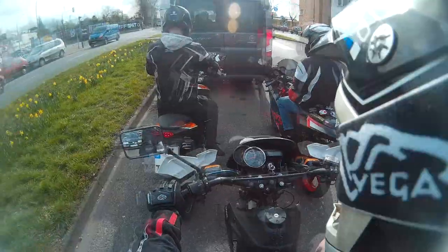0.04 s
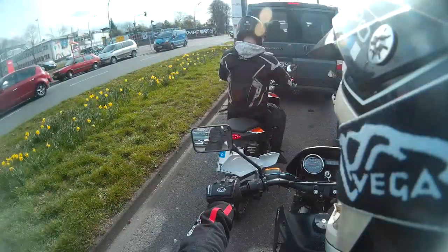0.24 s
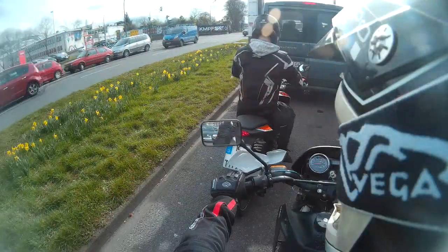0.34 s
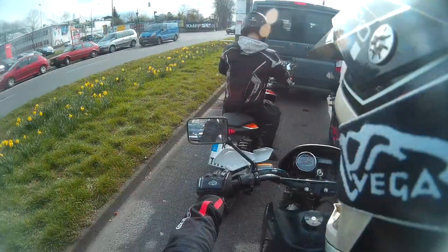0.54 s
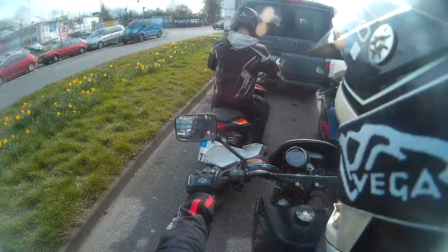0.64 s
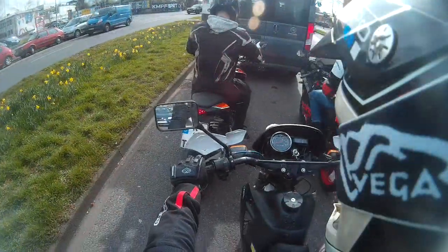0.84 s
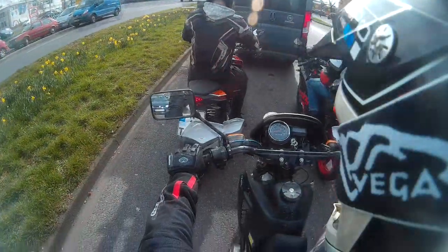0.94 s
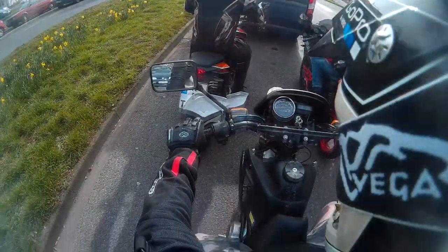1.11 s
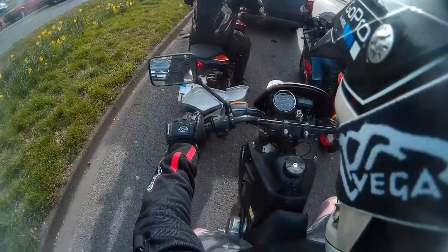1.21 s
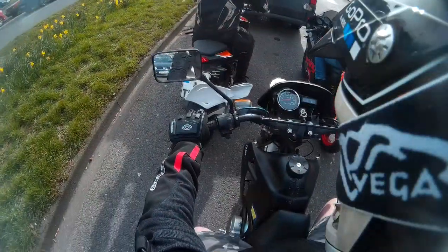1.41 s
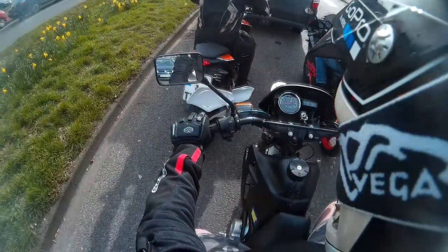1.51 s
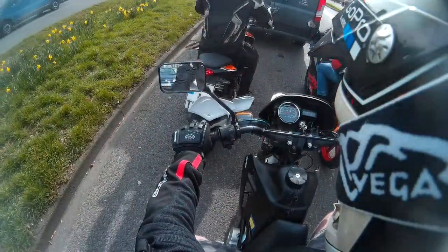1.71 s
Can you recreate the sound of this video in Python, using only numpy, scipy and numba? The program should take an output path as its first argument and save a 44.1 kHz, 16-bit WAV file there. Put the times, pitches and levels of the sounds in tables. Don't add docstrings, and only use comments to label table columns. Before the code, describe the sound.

Close outdoor helmet recording of one small motorcycle engine: faint puttering, a swift buzzing rev with nasal intake rasp, then throttle shut and a whirring, rattling descent with soft pops over faint idling engines.

```python
import sys
import numpy as np
from scipy import signal
from scipy.fft import rfft, irfft
from scipy.io import wavfile
from scipy.ndimage import uniform_filter1d
from numba import njit

SR = 44100
rng = np.random.default_rng(int(sys.argv[2]) if len(sys.argv) > 2 else 0)


def wav_record(signal):
    frames = np.transpose(np.atleast_2d(signal))
    bounded = np.clip(frames, -1, 1)
    quanta = np.round(bounded * 32767).astype(np.int16)
    wavfile.write(sys.argv[1], SR, quanta)


def how_loud(loudness_db):
    steps = np.asarray(loudness_db, float) / 20
    return 10 ** steps


N = 77175


def level(x, db):
    return x * how_loud(db) / np.sqrt(np.mean(x ** 2))


def sine(cycles):
    return np.sin(2 * np.pi * cycles)


@njit
def resonator(x, hz, width):
    y, band, low = np.empty(len(x)), 0., 0.
    g, damping = np.tan(np.pi * hz / SR), width / hz
    for i in range(len(x)):
        v = (band + g * (x[i] - low)) / (1 + g * (g + damping))
        band = 2 * v - band
        low += 2 * g * v
        y[i] = damping * v
    return y


def ring(x, peaks):
    out = 0
    for k, (hz, width, db) in enumerate(peaks):
        out = out + (-1) ** k * how_loud(db) * resonator(x, float(hz), float(width))
    return out


def colour(x, points):
    hz, db = np.array(points).T
    f = np.maximum(np.arange(N // 2 + 1) * SR / N, 1)
    return irfft(rfft(x) * how_loud(np.interp(np.log(f), np.log(hz), db)), N)


def walk(rate):
    hold = int(SR / rate)
    steps = np.repeat(rng.standard_normal(N // hold + 1), hold)[:N]
    return uniform_filter1d(uniform_filter1d(steps, hold), hold)


@njit
def feed_back(x, back, keep):
    y = x.copy()
    for i in range(len(x)):
        if back[i] >= 0:
            y[i] += keep * y[int(back[i] + .5)]
    return y


def repeating(turns, keep):
    fresh = rng.standard_normal(N) * np.sqrt(1 - keep ** 2)
    one_turn_ago = np.interp(turns - 1, turns, np.arange(N) * 1., left=-1.)
    return feed_back(fresh, one_turn_ago, keep)


def orders(turns, hz, table, peaks, leak_db, wander_db, slip):
    out = 0
    for k, db in table:
        power = how_loud(2 * leak_db)
        for centre, width, peak_db in peaks:
            power = power + how_loud(2 * peak_db) / (1 + (2 * (k * hz - centre) / width) ** 4)
        loudness = np.sqrt(power) * how_loud(db + wander_db * walk(13.8))
        out = out + loudness * sine(k * turns + rng.random() + slip * walk(24.55))
    return np.sqrt(2) * out


# (centre [Hz], width [Hz], level [dB])
AIRBOX_MODES = [(1105, 13, -8), (1550, 23, -5), (2080, 400, -9.5), (2550, 29, 3.5), (2827, 19, 1.5),
                (3086, 96, -8.5), (5060, 58, -12.5), (6000, 170, -15), (7420, 230, -28.5), (9450, 85, -44),
                (10070, 310, -41), (12300, 1100, -61), (13700, 270, -36)]
# (frequency [Hz], density [dB per Hz])
AIR_RUSH = [(500, -3.5), (1600, -3.5), (3400, 4.5), (4100, -28.5), (6000, -23), (8000, -37), (13900, -52),
            (15500, -70)]
GULP_S, GULP_EDGE_S, GULP_STRETCH = .00855, .0015, .2
HOWL_REST_HZ, HOWL_FROM_HZ, HOWL_TO_HZ = 1950, 2600, 2070
FULL_SPEED = 94
OVERTONE_FROM_HZ, OVERTONE_TO_HZ = 3750, 2800


def intake(turns, hz, open_db):
    since, turn = turns % 1 / hz, turns.astype(int)
    gulp_s = GULP_S * (FULL_SPEED / hz) ** GULP_STRETCH
    gate = np.clip(np.minimum(since, gulp_s - since) / GULP_EDGE_S, 0, 1)
    gate = gate * (1 - .24 * np.cos(2 * np.pi * 198 * (since + .00015)))
    rasp = repeating(turns, .7) * gate

    start_hz = HOWL_REST_HZ + (HOWL_FROM_HZ - HOWL_REST_HZ) * hz / FULL_SPEED
    glide = since ** 2 / (2 * GULP_S)
    cycles = start_hz * since + (HOWL_TO_HZ - start_hz) * glide
    chance = rng.standard_normal((200, 2))
    slip, size = .038 * np.cumsum(chance[:, 0]), how_loud(1.0 * chance[:, 1])
    howl = resonator(gate * size[turn] * sine(cycles + slip[turn]), 2140., 610.)

    upper = OVERTONE_FROM_HZ * since + (OVERTONE_TO_HZ - OVERTONE_FROM_HZ) * glide
    upper_gain = how_loud(-10 + 2.5 * walk(95.1))
    howl = howl + upper_gain * gate * sine(upper + .2 * walk(150))

    rasp = level(ring(rasp, AIRBOX_MODES), -10) + level(colour(rasp, AIR_RUSH), -9.5)
    snap = rng.standard_normal(N) * gate * np.exp(-since / .003)
    snap = colour(snap, [(2000, -30), (4000, 0), (8000, -9), (14000, -18), (15500, -30)])
    howl = howl + level(snap, -27)
    return how_loud(open_db) * level(howl, 0) + how_loud(.8 * open_db - 7) * rasp


# (centre [Hz], width [Hz], level [dB])
HOT_PIPE = [(81, 67, -17.5), (141, 33, -9), (259.3, 39.6, 0), (322, 49, -4.5), (381.6, 26, -4.5),
            (447.4, 43, 1), (542, 60, -9), (723, 70, -10), (1086, 89, -9.5)]


def firing(turns, hz, open_db, shut):
    even = [(k, 0) for k in range(1, 14)]
    stack = orders(turns, hz, even, HOT_PIPE, leak_db=-32, wander_db=1.0, slip=.029)
    drone = level(resonator(rng.standard_normal(N), 450., 30.), -41)
    return how_loud(-24.5 + .58 * open_db) * stack + how_loud(.25 * open_db) * drone * (1 - shut)


# (centre [Hz], width [Hz], level [dB])
CASE_MODES = [(1075, 40, -14), (1240, 40, -9), (1522, 70, -5.5), (1924, 60, 2), (2065, 127, 1.5),
              (2213, 60, 3), (2818, 94, -8), (3000, 202, -1), (3260, 90, -12), (4600, 300, -15),
              (5050, 260, -15), (5650, 300, -19), (7530, 200, -32)]
# (frequency [Hz], density [dB per Hz])
CASING_WALLS = [(100, -13), (450, -8.5), (800, -14), (1600, -7), (3500, -11.5), (4100, -20), (7000, -30.5),
                (15500, -60.5)]
# (multiple of crank rate [1], level [dB])
GEAR_TEETH = [(12, -2), (14, -3), (16, 0), (17, -4), (22, 3), (23, -11), (24, -7), (25, -11), (26, -2),
              (27, -5), (28, -9), (29, -5), (30, -4), (31, -4), (32, -7), (34, -10)]
# (centre [Hz], width [Hz], level [dB])
GEARBOX_MODES = [(1062, 51, -12), (1241, 41, -9.5), (1511, 106, -13), (1917, 110, -3), (2066, 170, 0.5),
                 (2176, 69, -1.5), (3030, 320, -4)]
# (multiple of crank rate [1], level [dB])
PUMP_PULSES = [(1, -14), (2, -18), (3, -14), (4, 0), (5, -7), (6, -10), (7, -17), (8, -15), (9, -23),
               (10, -12)]
# (centre [Hz], width [Hz], level [dB])
OVERRUN_PIPE = [(157, 34, 4), (317, 110, -11), (377.8, 33.5, -2), (449.9, 35.8, 3), (652, 29, 4),
                (708, 55, -3.5)]


def mechanics(turns, hz, run_db, shut):
    clatter = repeating(turns, .45)
    cases = level(ring(clatter * how_loud(1.5 * walk(60)), CASE_MODES), -3)
    cases = cases + level(colour(clatter, CASING_WALLS), -1)
    teeth = orders(turns, hz, GEAR_TEETH, GEARBOX_MODES, leak_db=-16, wander_db=2.5, slip=.1)
    pump = orders(turns, hz, PUMP_PULSES, OVERRUN_PIPE, leak_db=-18, wander_db=1.5, slip=.0085)
    return how_loud(run_db) * (cases + how_loud(-1.5) * teeth + shut * pump)


# (time [s], peak level [dB], pitch
# [Hz])
POP_EVENTS = [(0, -40, 300), (.035, -43, 293), (.072, -36, 296), (.159, -36, 280), (.245, -33, 275),
              (.323, -35, 270), (.415, -35, 290), (.729, -39, 300), (.775, -41, 290), (.819, -39, 295),
              (.909, -39, 300), (1.009, -39, 300), (1.1, -39, 297), (1.317, -35, 295), (1.366, -34.5, 305),
              (1.413, -35, 310), (1.455, -33.5, 300), (1.494, -34.5, 290), (1.531, -34, 285),
              (1.56, -42, 310), (1.61, -43, 260), (1.651, -42, 270), (1.736, -36, 270)]
POP_RISE_S, POP_FALL_S = .006, .0062


def pops(t):
    out = np.zeros(N)
    for s, db, hz in POP_EVENTS:
        since = np.maximum(t - s + .002, 0)
        swell = (1 - np.exp(-(since / POP_RISE_S) ** 2)) * np.exp(-since / POP_FALL_S)
        tone = sine(hz * since) + .36 * sine(1.95 * hz * since)
        out += how_loud(db + 4) * 2 * swell * tone
    return out


# (frequency [Hz], density [dB per Hz])
STREET_HUM = [(12, 8), (25, -4), (112, -5), (289, -6), (705, -18.5), (1670, -8), (2400, -43),
              (15500, -34.5)]


def street(t):
    fade_db = -2 * t
    flutter = rng.standard_normal(N) * how_loud(2 * walk(4.9))
    hum = level(colour(flutter, STREET_HUM), -51) * how_loud(fade_db)
    whine = how_loud(-76.5 + fade_db + 3 * walk(14.5)) * np.sqrt(2) * sine(6804 * t)
    return hum + whine


# (time [s], level [dB])
THROTTLE_HAND = [(0, -70), (.09, -58), (.22, -50), (.245, -42), (.33, -35.5), (.41, -33.5), (.45, -31.5),
                 (.52, -28.5), (.593, -28), (.6, -60), (1.75, -70)]
# (time [s], speed [turns per s])
CRANK_SPEED = [(0, 43), (.2, 47.8), (.24, 52), (.32, 62), (.4, 74.3), (.48, 85.5), (.52, 89.5), (.56, 92.8),
               (.595, 95.6), (.62, 95), (.68, 92.3), (.76, 89.7), (.88, 85.5), (1.0, 80.7), (1.2, 72.2),
               (1.4, 63.8), (1.56, 57.3), (1.75, 52)]
# (time [s], level [dB])
MECHANICAL_LEVEL = [(0, -56), (.2, -54), (.4, -40), (.58, -36.5), (.67, -38), (.8, -38), (1.08, -41.5),
                    (1.17, -41.5), (1.35, -44.5), (1.56, -47), (1.75, -50.5)]
PORT_OPENS_AT_S = .3845
ECHO_S, ECHO_DB = .0173, -15


def scene():
    t = np.arange(N) / SR
    hz = np.interp(t, *np.array(CRANK_SPEED).T)
    turns = np.cumsum(hz) / SR
    turns = turns + (-np.interp(PORT_OPENS_AT_S, t, turns)) % 1
    open_db = np.interp(t, *np.array(THROTTLE_HAND).T)
    run_db = np.interp(t, *np.array(MECHANICAL_LEVEL).T)
    shut = np.clip((t - THROTTLE_HAND[-3][0]) / .02, 0, 1)
    bike = intake(turns, hz, open_db) + firing(turns, hz, open_db, shut)
    bike = bike + mechanics(turns, hz, run_db, shut) + pops(t)
    echo = np.interp(t - ECHO_S, t, bike, left=0)
    return (bike + how_loud(ECHO_DB) * echo + street(t))[None]


def band_limit(x):
    return signal.sosfilt(signal.butter(12, 15620, fs=SR, output="sos"), x)


def record(dry):
    microphone = signal.butter(N=3, Wn=[16, 14200], btype="band", fs=SR, output="sos")
    top_cut = signal.ellip(8, .2, 60, 15600, fs=SR, output="sos")
    mix = signal.sosfilt(top_cut, signal.sosfilt(microphone, dry))
    return band_limit(mix)


dry = scene()
out = record(dry)
wav_record(out)
```